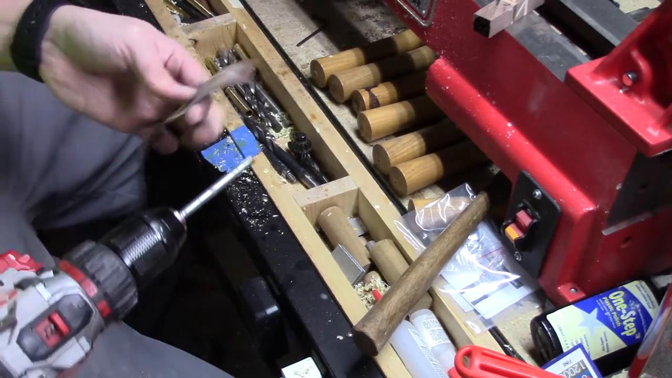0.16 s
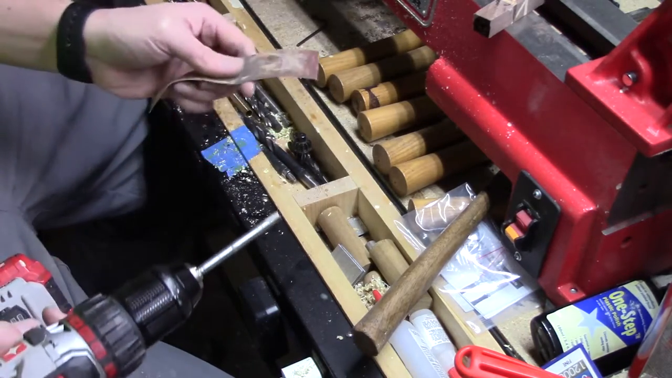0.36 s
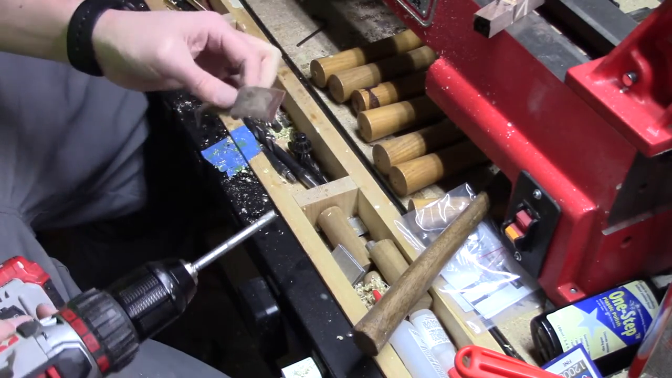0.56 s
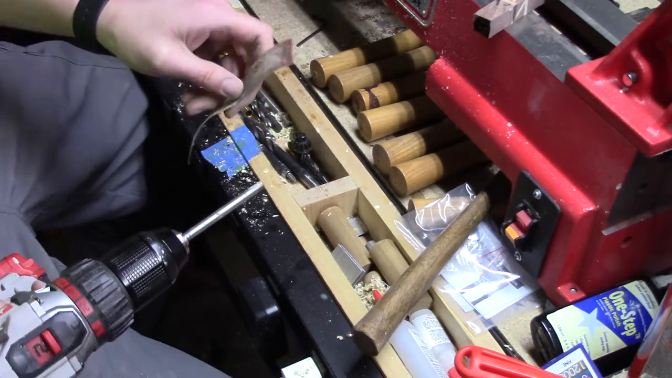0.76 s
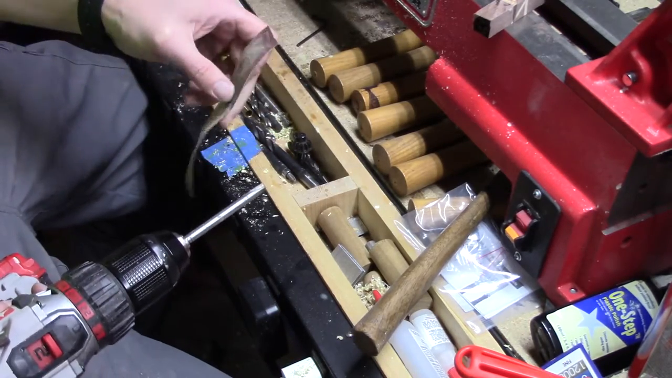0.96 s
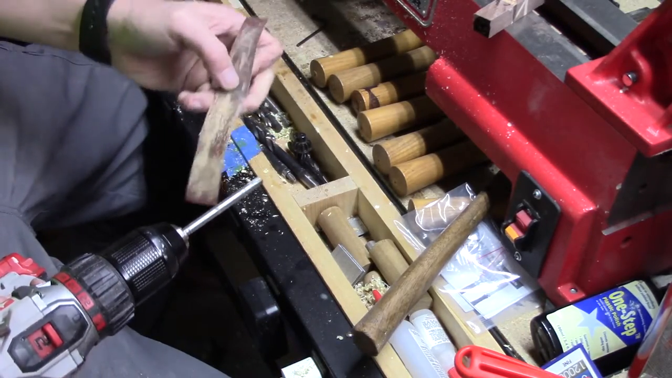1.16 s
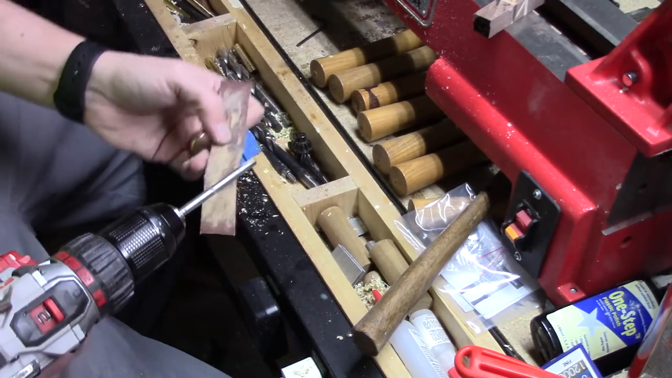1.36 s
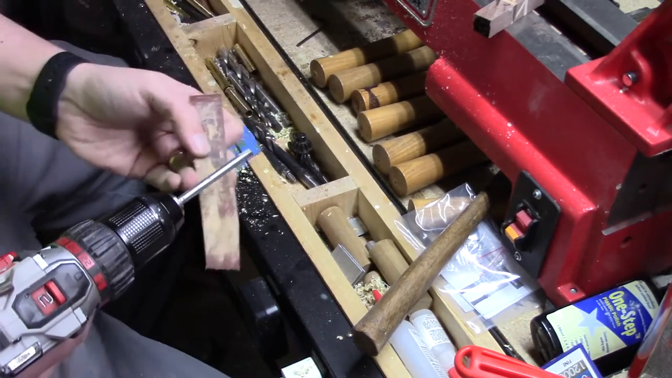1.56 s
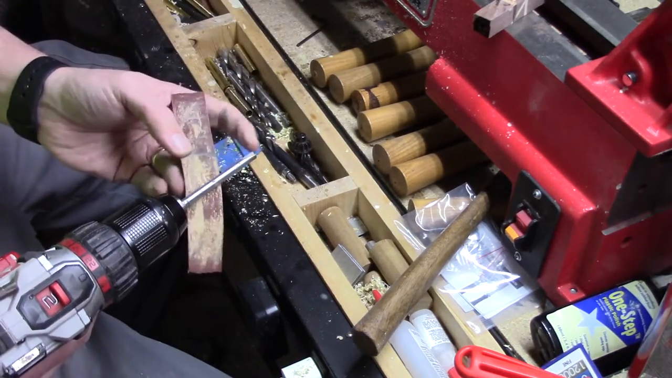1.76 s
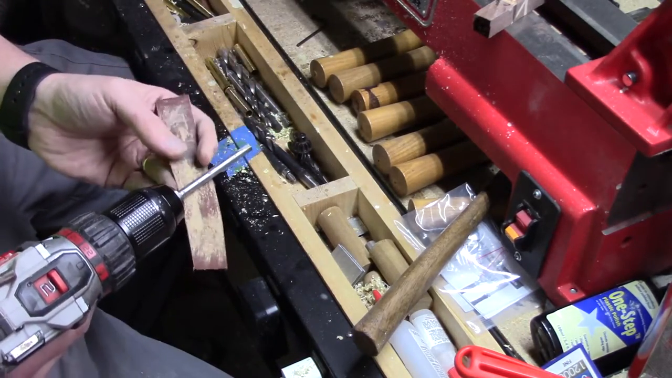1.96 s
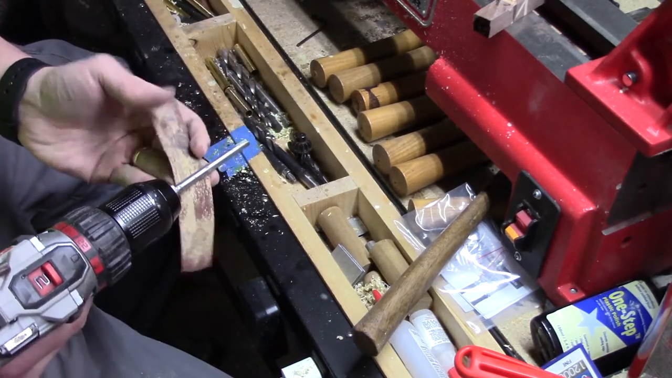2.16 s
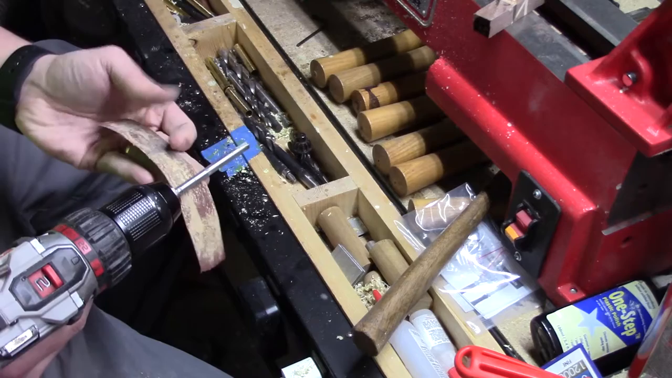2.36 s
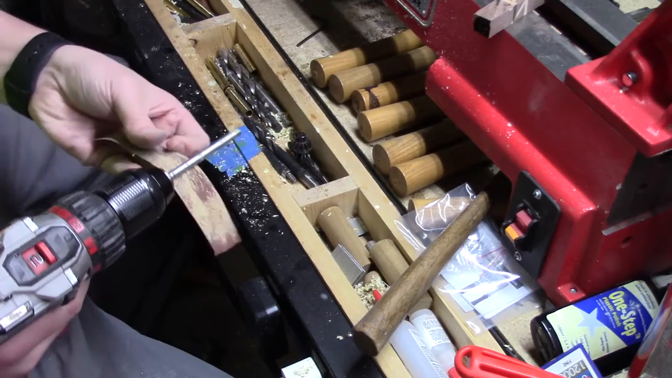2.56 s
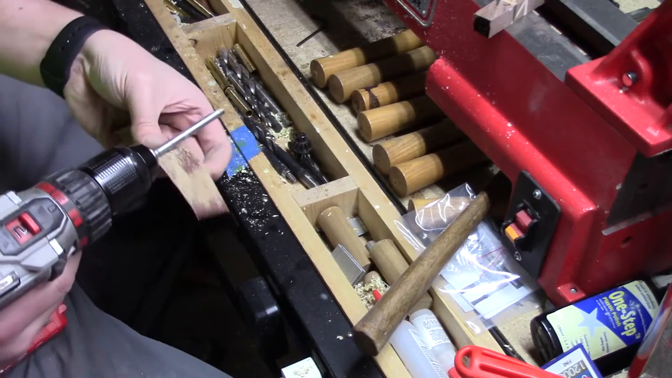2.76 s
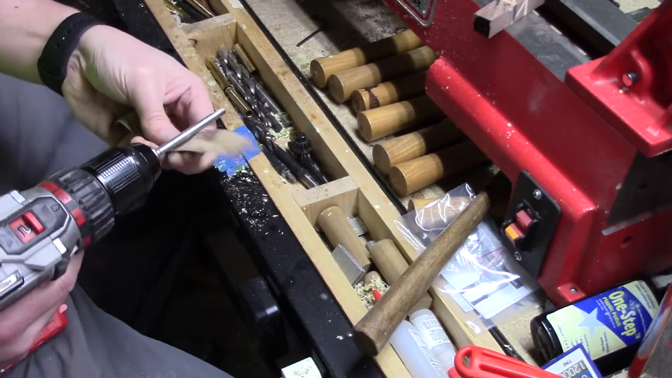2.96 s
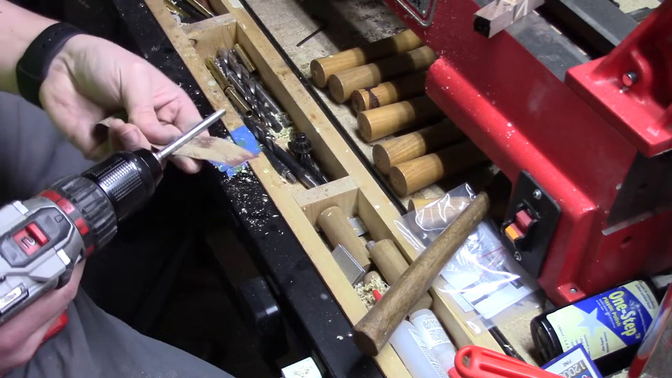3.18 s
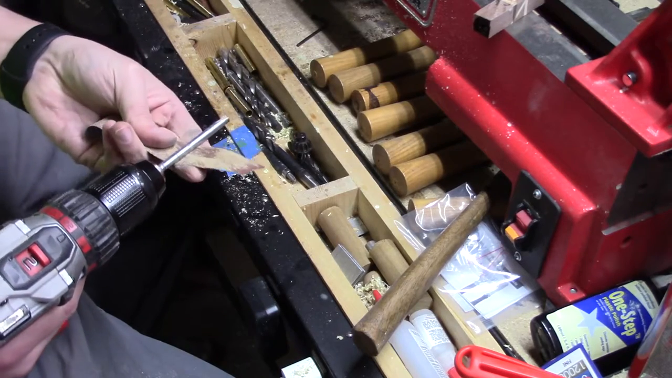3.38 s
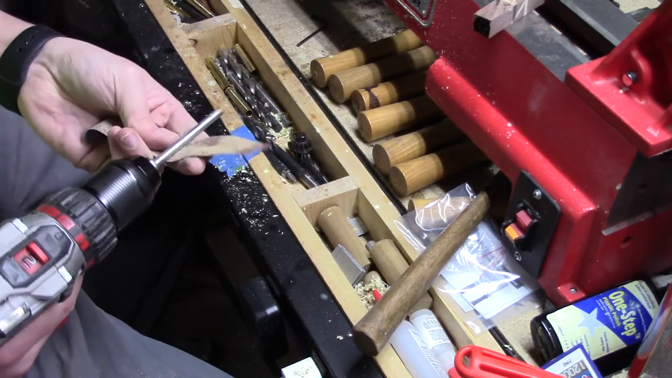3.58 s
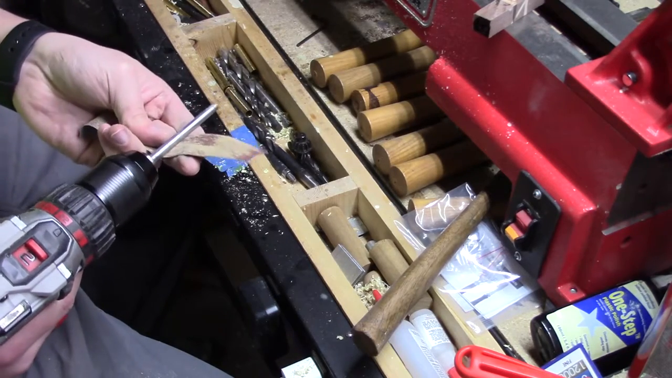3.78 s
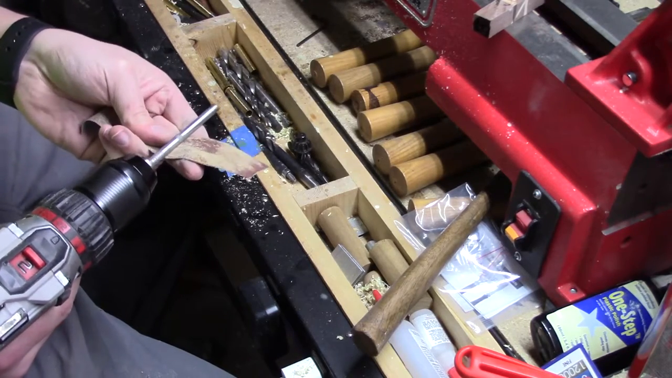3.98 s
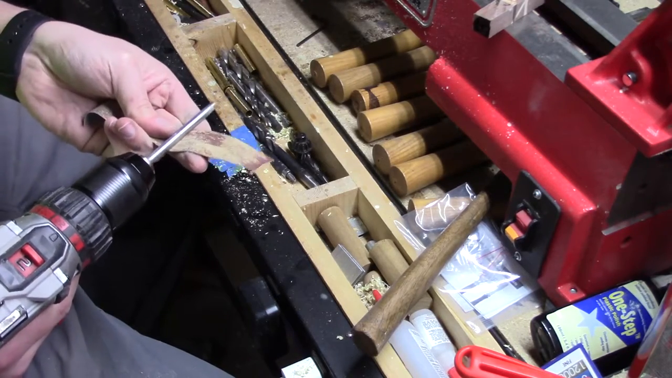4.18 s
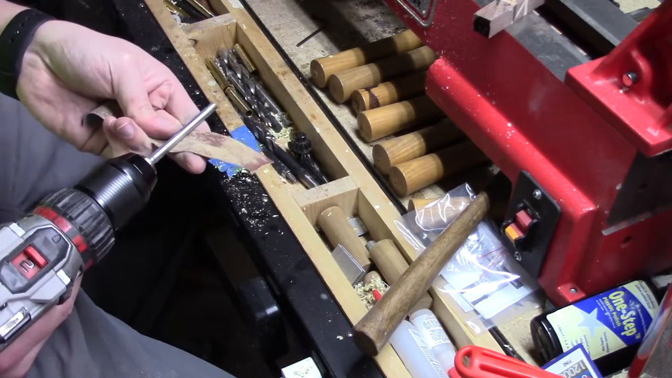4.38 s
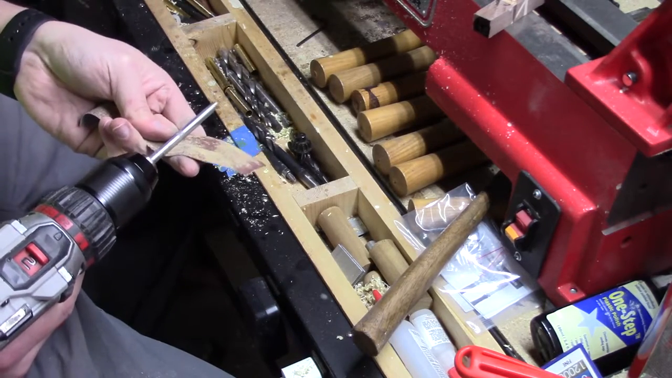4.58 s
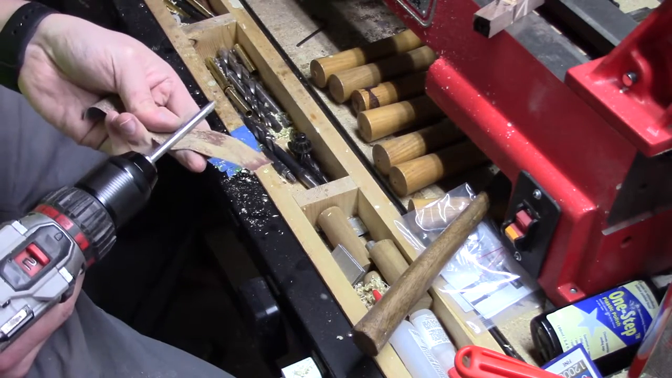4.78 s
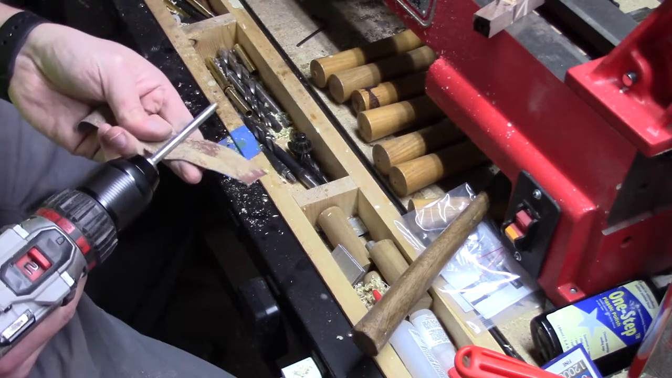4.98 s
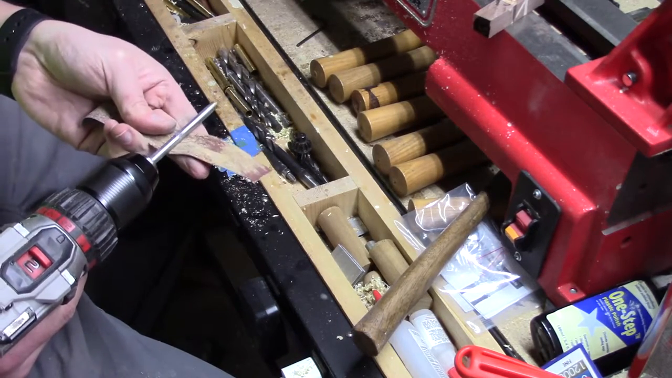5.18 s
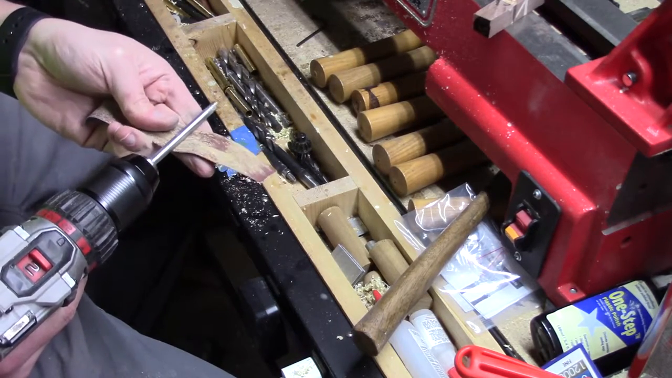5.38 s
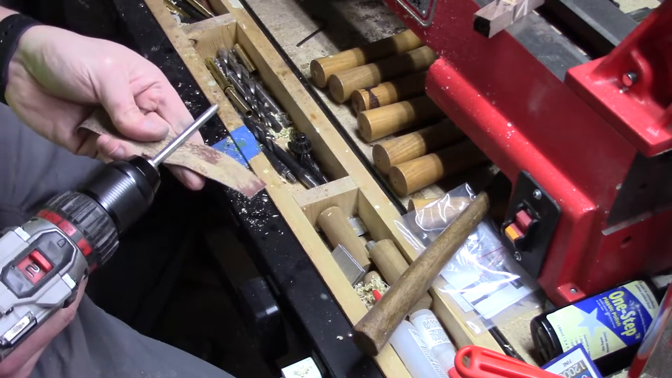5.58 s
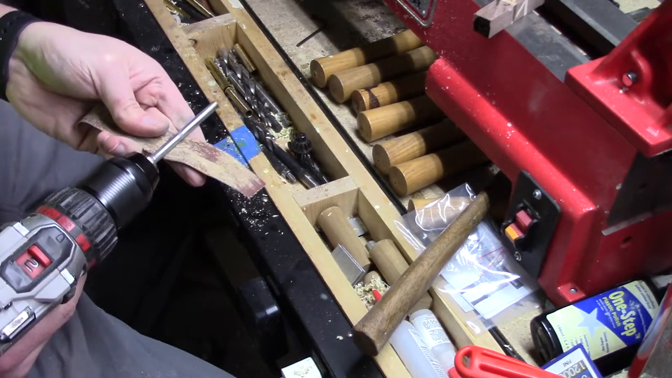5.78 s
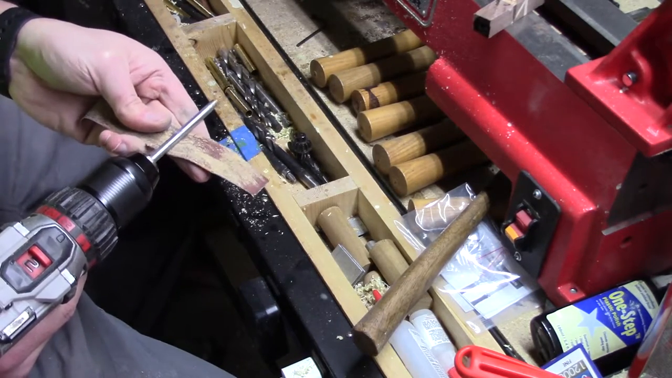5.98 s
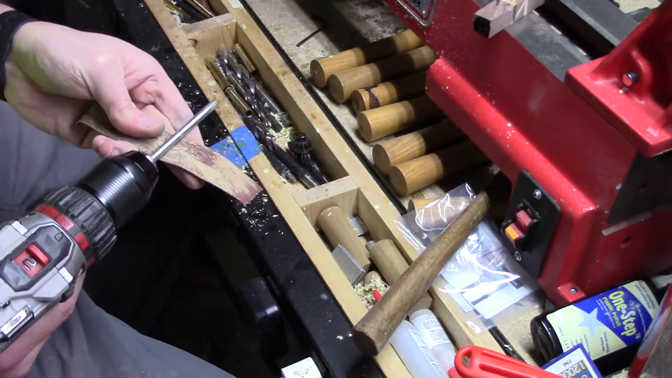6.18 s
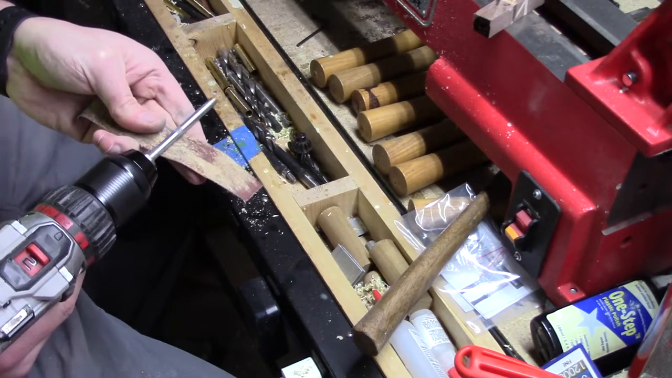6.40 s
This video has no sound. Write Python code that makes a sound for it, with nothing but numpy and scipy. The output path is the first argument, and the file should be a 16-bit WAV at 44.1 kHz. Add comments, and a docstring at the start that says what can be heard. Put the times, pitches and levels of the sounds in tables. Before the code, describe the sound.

After faint scraping and ticks of handled sandpaper, a cordless drill starts, whining and clattering, then speeds up and keeps running.

```python
"""A small, quiet workshop with humming lights. A cordless drill has just braked and rings out; fingers
shift a strip of sandpaper, its grit scraping and its creases snapping. At 3.5 s the gears clunk as they
take up slack and the motor runs up to part speed, then at 4.6 s to full speed. Tones locked to the
armature whine over gear clatter that rings the plastic housing."""
import sys
import numpy as np
from scipy import signal
from scipy.fft import rfft, irfft, next_fast_len
from scipy.io import wavfile
from scipy.ndimage import uniform_filter1d

SR = 44100
rng = np.random.default_rng(int(sys.argv[2]) if len(sys.argv) > 2 else 0)


def dump_mix(stems):
    """Bounce the given channels to the path in sys.argv[1] as a 16-bit WAV at rate SR."""
    frames = np.atleast_2d(stems).T  # one column per channel
    limited = np.clip(frames, -1, 1)  # hard clip at full scale
    pcm = np.round(limited * 32767).astype(np.int16)
    wavfile.write(sys.argv[1], SR, pcm)


N = 283993
TIME = np.arange(N) / SR

# trigger pulled or paper pressed harder: (time [s], target speed [Hz], time constant [s], sag [Hz/s])
SPEED_CHANGES = [(3.536, 246, .085, 0), (3.75, 254.6, .13, 0), (4.36, 252.1, .1, 0),
                 (4.597, 322.8, .043, .5), (5.22, 321.8, .06, .4)]
START_S = SPEED_CHANGES[0][0]
# breakpoints of the level curves: (armature speed [Hz])
SPEED_GRID_HZ = (95, 145, 190, 231, 238, 250, 253.5, 255, 262, 289, 307, 318, 322)


def undb(db):
    """dB to gain."""
    return 10 ** (np.asarray(db) / 20)


def unit(x):
    """Scale to rms 1."""
    return x / np.sqrt(np.mean(x ** 2))


def peak_one(x):
    """Scale to peak 1."""
    return x / np.max(np.abs(x))


def band(x, hz, width_hz):
    """One resonance, gain 1 at its centre."""
    return signal.lfilter(*signal.iirpeak(min(hz, .45 * SR), hz / width_hz, SR), x)


def modes(x, table):
    """A body's resonances; neighbours alternate in sign."""
    return sum((-1) ** k * undb(db) * band(x, hz, width_hz) for k, (hz, width_hz, db) in enumerate(table))


def colour(x, points):
    """Filter by (frequency [Hz], gain [dB]) points."""
    hz, db = np.transpose(points)
    size = next_fast_len(N)
    bin_hz = np.arange(size // 2 + 1) * SR / size
    gain = undb(np.interp(np.log(bin_hz + 1), np.log(hz), db))
    return irfft(rfft(x, size) * gain, size)[..., :N]


def walk(rate_hz, size=N):
    """Random steps, smoothed twice; spread near 1."""
    hold = int(SR / rate_hz)
    steps = np.repeat(rng.standard_normal(size // hold + 1), hold)
    return 1.18 * uniform_filter1d(uniform_filter1d(steps, hold), hold)[:size]


def grit(scatter_db):
    """Many tiny impacts of uneven size."""
    return unit(rng.standard_normal(N) * undb(scatter_db * rng.exponential(size=N)))


def room_air():
    """Distant air noise, partly different left and right."""
    # (frequency [Hz], relative level [dB])
    spectrum = [(15, -48), (25, -6), (66, -3), (118, 2), (363, 8), (1240, -2.5), (1390, -4), (1810, -6.5),
                (8320, -35), (11200, -36), (15000, -37)]
    mid, side = colour(rng.standard_normal((2, N)), spectrum)
    return undb(-60 + .81 * walk(2.9)) * np.array([mid + .73 * side, mid - .6 * side]) / np.std(mid)


def light_hum():
    """Wavering hum of the lights."""
    # (frequency [Hz], rms level [dB])
    partials = [(119.5, -75), (240, -77), (300, -80), (360, -75)]
    return sum(undb(db + 2.5 * walk(4)) * np.sqrt(2) * np.sin(2 * np.pi * hz * TIME) for hz, db in partials)


def room_tail(t60_s=.2):
    """Wall reflections: two decaying noise responses of unit energy."""
    t = np.arange(int(.4 * SR)) / SR
    tail = rng.standard_normal((2, len(t))) * np.exp(-np.log(1000) * t / t60_s) * (t > .003)
    return tail / np.sqrt(np.sum(tail ** 2, axis=1, keepdims=True))


def paper_scrape():
    """Grit scrapes the strip: a faint rustle, and slides that swell and fade, each at its own pitch."""
    # (frequency [Hz], width [Hz], gain [dB])
    strip_modes = [(3120, 1000, -7.5), (5230, 1430, 2), (8100, 2200, 3), (10300, 2000, 3),
                   (12000, 5300, -3.5)]
    # (time [s], low band [dB], treble [dB])
    rustle = [(0.15, -69, -66), (0.34, -69, -66), (0.52, -68, -61), (0.63, -68, -61), (0.83, -68, -66),
              (1.03, -67, -67), (1.23, -66, -66), (1.45, -69, -68), (2.17, -67, -62), (2.32, -69, -65),
              (2.57, -70, -67), (2.85, -70, -63), (3.36, -69, -66), (3.52, -68, -63)]
    # (centre time [s], level [dB], pitch [Hz], relative low band [dB], time to -6 dB [s])
    slides = [(0.348, -45, 7440, -13, .032), (0.446, -44, 8250, -18, .034), (0.561, -43, 6130, -16, .015),
              (0.631, -52, 9400, -13, .012), (0.671, -57, 8000, -9, .024), (0.746, -48.5, 9800, -21, .03),
              (0.797, -45.5, 8500, -12.5, .025), (1.13, -63, 2100, 3, .1), (1.238, -57, 8300, -16, .017),
              (1.305, -50, 7700, -12, .032), (1.355, -58, 5300, -5, .03), (1.512, -55, 4790, -8.5, .054),
              (1.660, -44.5, 5300, -7, .015), (1.706, -50, 5350, -9, .048), (1.747, -35.5, 4970, -16, .011),
              (1.882, -44, 9700, -17, .012), (1.978, -46, 3060, -13, .016), (2.036, -51, 5570, -4, .014),
              (2.079, -45, 8100, -13, .008), (2.105, -52, 9500, -10, .009), (2.197, -57, 7700, -4, .03),
              (2.328, -44, 3100, -19, .015), (2.548, -55, 5340, -10, .044), (2.679, -48.5, 8800, -14, .032),
              (2.724, -58, 9000, -10, .01), (2.770, -49.5, 8700, -29, .033), (3.005, -43, 8200, -15, .021),
              (3.117, -47.5, 4830, -12, .022), (3.258, -58, 8500, -12, .015), (3.300, -55, 5200, -10, .04),
              (3.388, -58, 7340, -8, .008), (3.446, -53.5, 2070, -3, .014)]
    crackle = undb(2.2 * walk(180))  # grit catches and lets go
    grains, rub = (crackle * grit(scatter_db=1.8) for _ in range(2))
    low = unit(band(band(grains, 1900, 3000), 1900, 3000))
    treble = unit(modes(grains, strip_modes))
    times_s, *curves_db = np.transpose(rustle)
    low_gain, treble_gain = (undb(np.interp(TIME, times_s, db)) for db in curves_db)
    out = undb(2 * walk(6.7)) * (low_gain * low + treble_gain * treble)
    for at_s, db, hz, low_db, half_s in slides:
        span = slice(max(int((at_s - .3) * SR), 0), int((at_s + .33) * SR))
        swell_db = db - 6 * np.abs((TIME[span] - at_s) / half_s) ** 1.6
        pitched = unit(band(band(rub[span], hz, .26 * hz), hz, .26 * hz))
        out[span] += undb(swell_db) * (.47 * treble[span] + .42 * pitched + undb(low_db) * low[span])
    return out


def crease_snaps(decay_s=.0012, size=300):
    """Paper creases snap in short resonant ticks."""
    # (time [s], peak [dB], frequency [Hz])
    snaps = [(0.181, -48, 1780), (0.549, -30, 6040), (0.699, -39, 1910), (1.224, -34, 5400),
             (1.379, -45, 1340), (1.655, -35, 5110), (1.745, -27, 5140), (2.039, -39, 1150),
             (2.075, -30, 5730), (2.102, -35, 10300), (2.254, -41, 5150), (2.327, -31, 3050),
             (2.339, -36, 3060), (2.646, -32, 9710), (2.718, -46, 2440), (2.753, -37, 8380),
             (3.245, -34, 8310), (3.383, -42, 7380), (3.414, -42, 840), (3.430, -43, 800),
             (3.441, -40, 900), (3.464, -42, 1060)]
    envelope = np.exp(-np.arange(size) / (decay_s * SR))
    out = np.zeros(N)
    for at_s, db, hz in snaps:
        i = int(at_s * SR)
        out[i:i + size] += undb(db) * peak_one(band(envelope * rng.standard_normal(size), hz, .51 * hz))
    return out


def brake_ring(level_db=-27, t60_s=.19):
    """The brake's knock dies away in shell and room."""
    # (frequency [Hz], width [Hz], gain [dB])
    knock_modes = [(598, 81, 3.5), (1010, 600, -8), (1870, 390, -2), (3700, 490, -5.5), (5100, 770, -7),
                   (7500, 2800, -15.5)]
    return unit(modes(grit(scatter_db=.5), knock_modes)) * undb(level_db - 60 * TIME / t60_s)


def housing(x):
    """Resonant plastic shell, too small to radiate bass."""
    # (frequency [Hz], width [Hz], gain [dB])
    shell_modes = [(462, 235, -17), (585, 105, -6), (872, 290, -11.5), (1443, 148, -8.5), (1699, 111, -2.5),
                   (1996, 280, 1), (2109, 282, 1), (3006, 700, -3), (3530, 590, 0.5), (3826, 480, -1.5),
                   (5140, 590, -6), (5750, 500, -2.5), (6760, 1980, -9.5), (9230, 1200, -10),
                   (12800, 2800, -22.5)]
    return signal.sosfilt(signal.butter(3, 380, "high", fs=SR, output="sos"), modes(x, shell_modes))


def gear_clunks(decay_s=.0017, size=1500):
    """Gears take up slack: dull blows ring the housing."""
    # (time [s], peak [dB])
    blows = [(3.5365, -26), (3.5385, -2), (3.546, -6), (3.5505, -8), (3.557, -13)]
    envelope = np.exp(-np.arange(size) / (decay_s * SR))
    out = np.zeros(N)
    for at_s, db in blows:
        i = int(at_s * SR)
        blow = signal.lfilter(*signal.butter(1, 2500, fs=SR), envelope * rng.standard_normal(size))
        out[i:i + size] += undb(db) * peak_one(housing(blow))
    return out


def armature_speed(slack_hz=85.):
    """From the speed at which the slack is taken up, the armature nears each target; the fast ones sag."""
    hz = np.full(N, slack_hz)
    for at_s, target_hz, tau_s, sag_hz_per_s in SPEED_CHANGES:
        i = int(at_s * SR)
        t = TIME[i:] - at_s
        hz[i:] = target_hz - sag_hz_per_s * t - (target_hz - hz[i]) * np.exp(-t / tau_s)
    return hz


def gear_clatter(hz):
    """Tooth impacts in the housing; part repeats with the planet carrier, every 4 armature turns."""
    # at SPEED_GRID_HZ: (level [dB])
    clatter_db = (-21.5, -22, -21.5, -21, -20.5, -19.5, -18, -18, -17.5, -17, -16.5, -16, -16)
    turns = np.cumsum(hz) / SR
    # tooth errors: two patterns one carrier turn long, slowly trading places
    position = (turns / 4 % 1) * 600
    blend_rad = 1.293 * walk(5)
    patterns = [np.interp(position, np.arange(601), rng.standard_normal(601)) for _ in range(2)]
    errors = .3 * (np.cos(blend_rad) * patterns[0] + np.sin(blend_rad) * patterns[1])
    beat = 1 + .15 * sum(np.cos(2 * np.pi * per_turn * turns) for per_turn in (.25, 1, 2))
    clatter = unit(housing(beat * (grit(scatter_db=1.5) + errors)))
    rumble = undb(-39.5) * unit(band(rng.standard_normal(N), 275, 250))  # hand and bench shake
    return undb(np.interp(hz, SPEED_GRID_HZ, clatter_db) + .66 * walk(5.6)) * (clatter + rumble)


def steps_db(order, t):
    """Summed level steps of the tone at this multiple of the armature speed."""
    # (order [x speed], time [s], change [dB], ramp [s])
    steps = [(18, 3.955, -12, .015), (18, 3.985, 12, .02), (18, 5.25, -2.5, .2), (40, 5.5, -6, .1),
             (2, 6.02, 13.5, .17)]
    return sum(db * np.clip((t - at_s) / ramp_s, 0, 1) for k, at_s, db, ramp_s in steps if k == order)


def start_squeal(turns, t, half_s=.0055):
    """Order 12 bursts out as the motor starts."""
    # (time [s], level [dB])
    bursts = [(3.578, -16), (3.599, -19), (3.62, -29)]
    envelope = sum(undb(db - 6 * ((t - at_s) / half_s) ** 2) for at_s, db in bursts)
    return envelope * np.sin(2 * np.pi * 12 * turns + .8 * walk(150, len(t)))


def motor_whine(hz, t, part_hz=254, full_hz=322):
    """Armature and gear tones; under torque the two main ones flutter and the weak ones excite the shell."""
    # orders 18 and 15 at SPEED_GRID_HZ: (rms level [dB])
    order_18_db = (-50, -40, -35, -32, -27, -27, -25.5, -25.5, -32, -28, -23, -24, -16.5)
    order_15_db = (-50, -42, -37, -30, -31, -31, -26, -26, -40, -35, -31, -26, -24.5)
    # (order [x speed], rms at part speed [dB], rms at full speed [dB])
    weak_tones = [(1, -61, -51), (1.25, -68, -51), (1.75, -58, -52), (2, -50, -41), (2.75, -47, -50),
                  (3, -42, -36), (4, -46, -50), (5, -48, -39), (6, -45, -34), (9, -45, -32), (10, -40, -32),
                  (11, -43, -35), (11.25, -40, -42), (11.75, -38, -35), (12, -40, -38), (12.25, -36, -42),
                  (13, -37, -39), (20, -41, -35), (22, -38, -40), (22.75, -36, -45), (23, -43, -32),
                  (24, -46, -41), (25, -46, -35), (26, -47, -38), (28, -42, -48), (30, -48, -39),
                  (32, -52, -47), (33, -41, -51), (35, -41, -48), (36, -39, -50), (40, -42, -42),
                  (42, -54, -54), (45, -50, -55), (47, -50, -62), (50, -47, -50), (60, -52, -70)]
    flutter_db, shake_db, dip_db, howl_db = 4, 9, -3, 17  # at full torque
    howl_hz, howl_width_hz = 2110, 74  # shell resonance
    n, turns = len(t), np.cumsum(hz) / SR
    fast = np.clip((hz - part_hz) / (full_hz - part_hz), 0, 1)
    torque = np.clip(uniform_filter1d(np.gradient(hz), 900) * SR / 250, 0, 1)  # full at 250 Hz/s
    tones = start_squeal(turns, t)
    for order, curve_db in ((18, order_18_db), (15, order_15_db)):
        db = np.interp(hz, SPEED_GRID_HZ, curve_db) + steps_db(order, t) + 1.5 * walk(30, n)
        db += flutter_db * torque * walk(70, n)
        tones += undb(db) * np.sin(2 * np.pi * order * turns + .16 * walk(30, n))
    slow_db = 80 * np.minimum(np.log(hz / 175), 0)  # slow teeth knock but do not yet sing
    for order, part_db, full_db in weak_tones:
        db = part_db + fast * (full_db - part_db) + steps_db(order, t) + slow_db
        db += 2.5 * walk(7, n)  # tones come and go as the teeth settle
        resonance = np.exp(-((order * hz - howl_hz) / howl_width_hz) ** 2)
        db += torque * (dip_db + howl_db * resonance + (order == 1) * shake_db)
        waver_rad = .35 * walk(20, n)
        tones += undb(db) * np.sin(2 * np.pi * (order * turns + rng.random()) + waver_rad)
    return np.sqrt(2) * tones


def drill():
    """One armature speed drives whine and clatter, both silent until the trigger is pulled."""
    hz = armature_speed()
    start = int(START_S * SR)
    running = np.clip((TIME - START_S - .004) / .01, 0, 1)
    whine = np.pad(motor_whine(hz[start:], TIME[start:]), (start, 0))
    return running * whine, running * gear_clatter(hz)


def scene(room_db=-11.5):
    """Drill and paper close by; the noises carry the room's short tail; left and right differ a little."""
    # side channel: (frequency [Hz], gain [dB])
    side_spectrum = [(60, -6), (200, -21), (400, -27), (1000, -48), (2400, -50), (4400, -12), (8000, -21),
                     (11000, -12), (15000, -42)]
    tail = room_tail()
    whine, clatter = drill()
    noises = clatter + brake_ring() + gear_clunks() + paper_scrape() + crease_snaps()
    wet = signal.fftconvolve(noises[None], tail, axes=1)[:, :N]
    mid = whine + noises + undb(room_db) * wet[0]
    side = colour(.7 * whine + .13 * noises + wet[1], side_spectrum)
    return np.array([mid + side, mid - side]) + room_air() + light_hum()


def record(dry):
    """Steep low-pass at 15.7 kHz."""
    return signal.sosfilt(signal.ellip(14, .3, 90, 15700, fs=SR, output="sos"), dry)


dry = scene()
out = record(dry)
dump_mix(out)
```